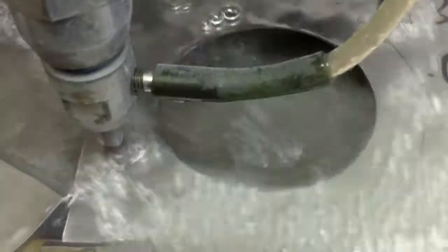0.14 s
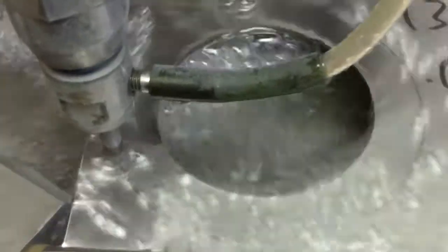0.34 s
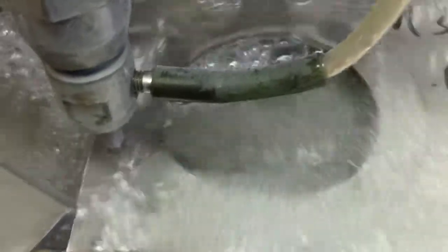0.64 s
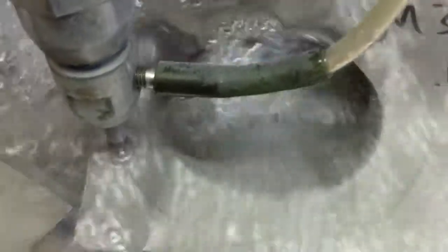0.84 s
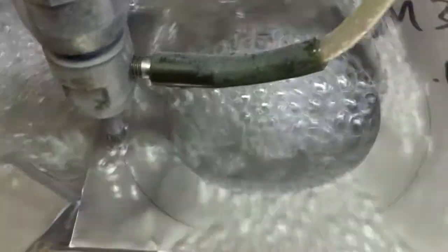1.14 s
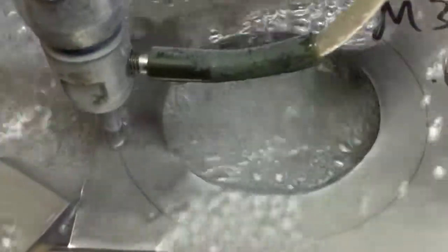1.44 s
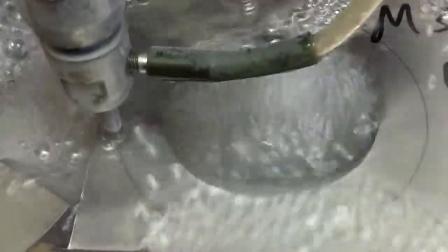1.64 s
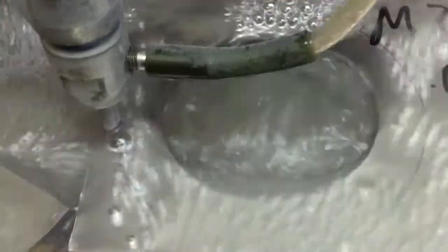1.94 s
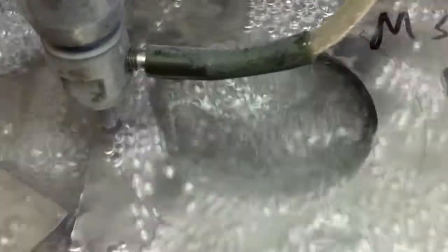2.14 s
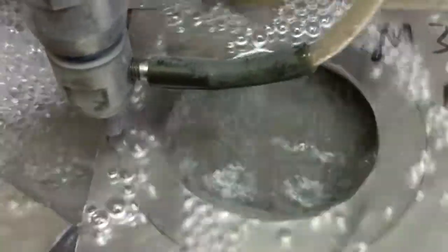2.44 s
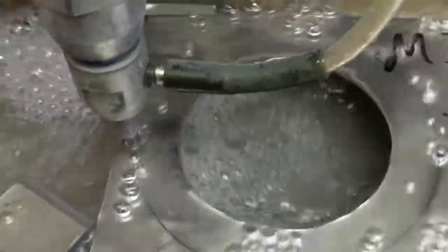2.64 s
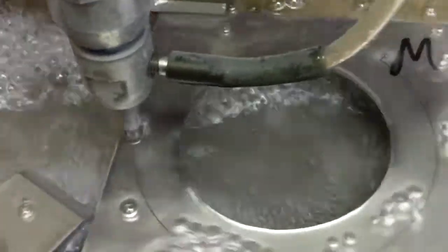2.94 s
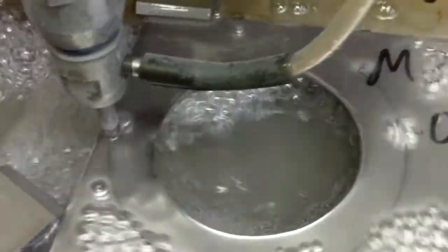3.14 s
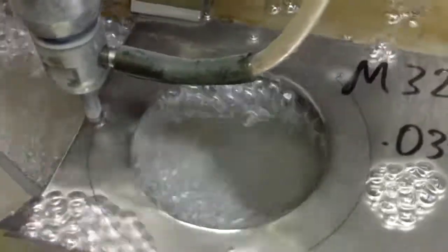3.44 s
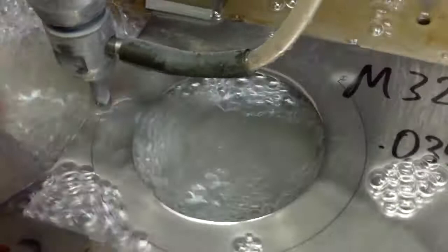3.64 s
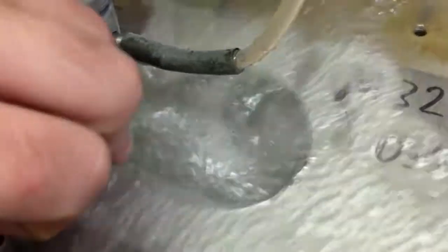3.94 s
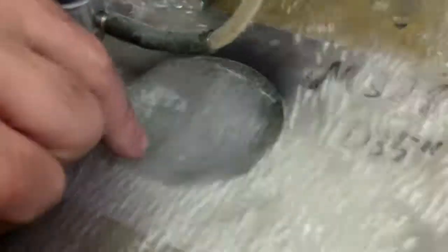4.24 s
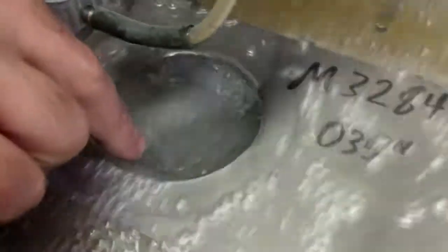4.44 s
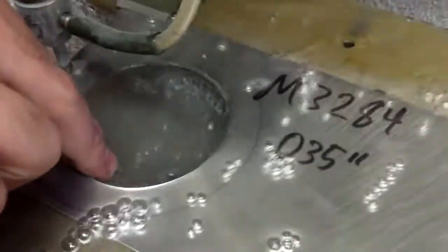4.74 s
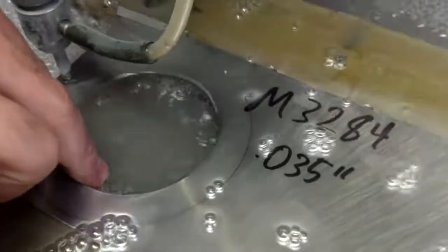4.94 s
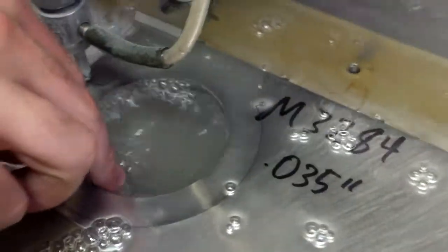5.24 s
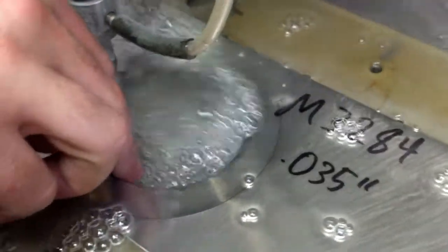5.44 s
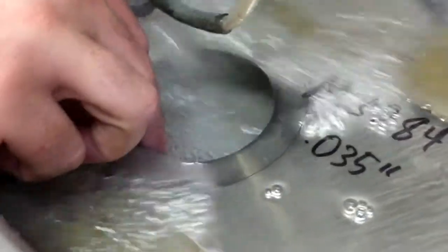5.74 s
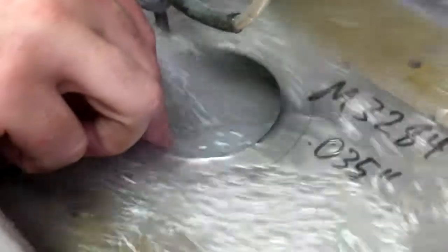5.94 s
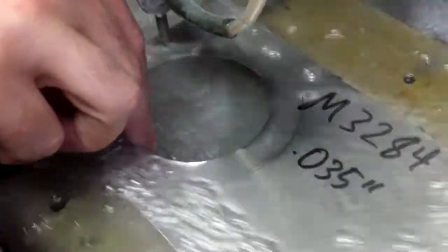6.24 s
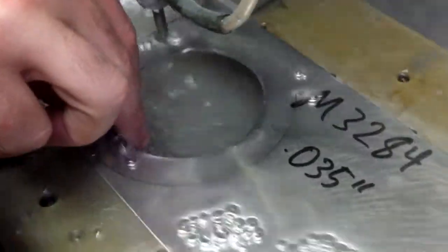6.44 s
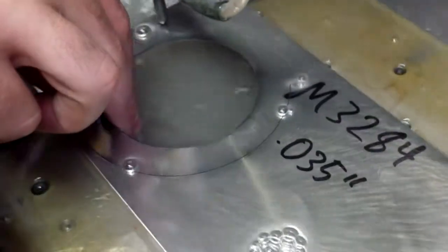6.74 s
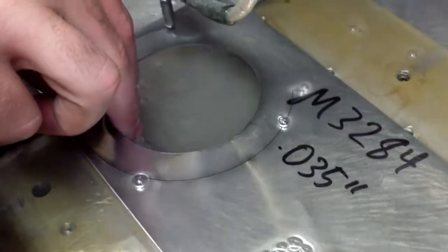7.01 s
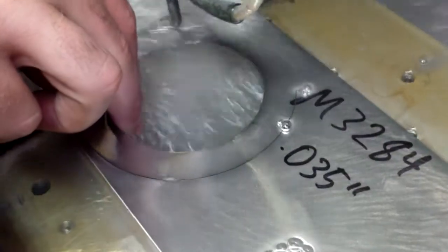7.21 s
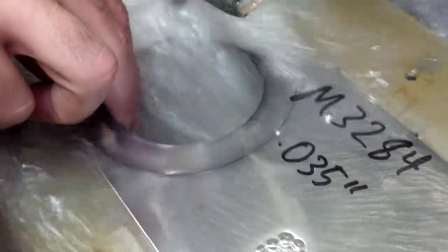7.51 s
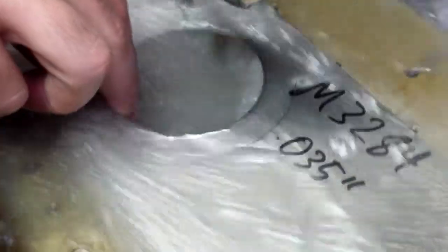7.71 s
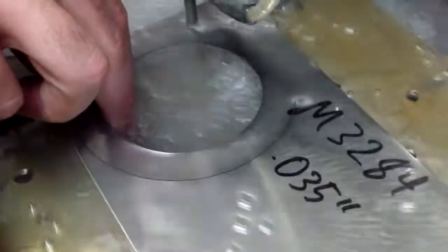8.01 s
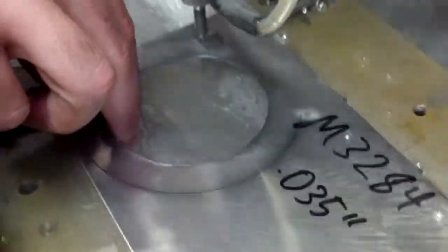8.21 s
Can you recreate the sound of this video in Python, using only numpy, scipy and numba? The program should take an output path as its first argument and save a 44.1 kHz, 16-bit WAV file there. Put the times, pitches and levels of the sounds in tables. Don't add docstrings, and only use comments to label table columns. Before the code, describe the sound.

A fierce treble hiss of pressurised water fills a workshop close-up, clipped and crackling, with spray knocking the microphone into bassy buffets. Small dips flutter through it. Waves smother the nozzle three times, the middle time longest, dropping the sound to muffled fizz, bubbling, metal resonance and humming machinery; each time the jet returns abruptly. The sound is essentially central, with only slight differences between sides.

```python
import sys
import numpy as np
from scipy import signal
from scipy.fft import rfft, irfft
from scipy.io import wavfile
from scipy.ndimage import uniform_filter1d
from numba import njit

SR = 44100
rng = np.random.default_rng(int(sys.argv[2]) if len(sys.argv) > 2 else 0)


def magnitude_from_level(level_db):
    exponent = np.asarray(level_db, float) / 20
    return 10 ** exponent


def unload_audio(sound):
    columns = np.transpose(np.atleast_2d(sound))
    steps = np.round(np.clip(columns, -1, 1) * 32767)
    wavfile.write(sys.argv[1], SR, steps.astype(np.int16))


N = 369116


def unit(x):
    return x / np.sqrt(np.mean(x ** 2))


def curves(table):
    s, *columns = np.transpose(table)
    return [np.interp(np.arange(N) / SR, s, column) for column in columns]


def coloured(points):
    hz, db = np.transpose(points)
    f = np.maximum(np.fft.rfftfreq(N, 1 / SR), 1)
    weight_db = np.interp(np.log(f), np.log(hz), db, left=-60)
    return unit(irfft(rfft(rng.standard_normal(N)) * magnitude_from_level(weight_db), N))


@njit
def svf(x, hz, width):
    y, band, low = np.empty(len(x)), 0., 0.
    for i in range(len(x)):
        g, damping = np.tan(np.pi * hz[i] / SR), width / hz[i]
        v = (band + g * (x[i] - low)) / (1 + g * (g + damping))
        band, low, y[i] = 2 * v - band, low + 2 * g * v, damping * v
    return y


def walk(rate):
    hold = int(SR / rate)
    steps = np.repeat(rng.standard_normal(N // hold + 1), hold)
    return 1.3 * uniform_filter1d(uniform_filter1d(steps, hold), hold)[:N]


def ring(hz, width, drift=0.0081, flicker_db=3.5):
    centre = hz * (1 + drift * walk(9))
    x = svf(svf(rng.standard_normal(N), centre, 1. * width), centre, 1. * width)
    return unit(x) * magnitude_from_level(flicker_db * walk(25))


# time in seconds, hiss level in dB, force as bass rasp in dB,
# spray opening (+ bright), wetness of the kerf (+ wet).
FLOW = [(0, -7.5, -31, 0.65, 1.6), (.3, -5, -34, 0.24, 0.091), (1.15, -5.5, -26.5, 0.01, 0.94),
        (2.0, -7, -29, 0, -0.44), (2.6, -7.5, -28, -0.14, .3), (2.9, -9, -29.5, 0.43, 0.49),
        (3.4, -7.5, -23.5, -0.27, 0.32), (3.65, -13.5, -29.5, -0.32, -0.71),
        (4.2, -9.5, -33.5, -0.38, 0.35), (4.65, -9, -32, 0.19, -0.0071), (4.85, -9, -21, 0.94, -1),
        (5.2, -7, -28.5, -.2, 1.6), (5.52, -13.5, -39.5, -0.9, 0.17), (6.3, -8.5, -31.5, 0.059, 0.29),
        (6.75, -8, -24.5, 0.64, 0.2), (7.1, -6.5, -28.5, -0.087, 1.43), (7.7, -7.5, -35.5, -0.083, 0.74),
        (8.37, -6, -22, 0.73, -.8)]
# start in seconds, end in seconds, drowned hiss in dB,
# depth from 0 to 1, churn in dB.
WAVES = [
    (3.651, 3.806, -30.5, 0.05, -32),
    (3.808, 4.113, -33.5, 0.1, -41.5),
    (5.606, 6.271, -29.5, 0.95, -41),
    (7.254, 7.536, -28.5, 0.2, -40.5),
    (7.536, 7.698, -30, 0.2, -31),
]
# start in seconds, length in seconds, level in dB.
SPITS = [(3.69, .006, -8.5), (3.694, .016, -19), (3.743, 0.006, -16), (3.787, .011, -25),
         (3.797, .008, -11.5), (3.87, .005, -25), (3.922, 0.0044, -16), (3.941, .005, -20),
         (3.977, .01, -23.5), (4.009, .006, -23), (4.048, 0.033, -15.5), (4.077, .041, -27.5),
         (5.624, .004, -18.5), (7.26, .012, -17), (7.272, .02, -22), (7.314, .005, -18),
         (7.371, 0.053, -11), (7.418, .026, -16), (7.446, .007, -6), (7.453, .012, -23), (7.465, .044, -8),
         (7.507, 0.025, -14.5), (7.558, .014, -11), (7.57, .008, -18), (7.628, .009, -11),
         (7.636, .013, -13.5), (7.649, .008, -24)]
# start in seconds, length in seconds, level in dB.
LULLS = [(0.104, .018, -13), (0.685, 0.016, -28), (0.701, .011, -16), (0.769, 0.01, -21),
         (.996, 0.013, -25), (2.342, .008, -32), (2.371, 0.018, -15.5), (3.596, 0.01, -25),
         (4.118, .078, -12.5), (4.239, .012, -16), (4.252, 0.013, -25), (4.302, 0.01, -24),
         (5.428, .095, -11.5), (5.432, .005, -17), (5.457, 0.006, -22), (5.482, 0.0032, -10),
         (5.498, 0.0087, -25), (5.524, .093, -24), (4.15, .005, -17), (4.178, .007, -17),
         (7.224, 0.038, -13.5), (7.23, 0.0034, -26), (7.481, .005, -20), (7.499, 0.0044, -24),
         (7.74, 0.0045, -22), (7.84, 0.0068, -3), (7.85, .009, -22)]
RECOVER_DB, RECOVER_S = 8, 0.14


def cover():
    i = np.arange(N)
    held, depth, drowned = curves(FLOW)[0], np.zeros(N), np.zeros(N, bool)
    span = lambda s, end: slice(int(s * SR), int(end * SR))
    for s, end, db, deep, _ in WAVES:
        held[span(s, end)], depth[span(s, end)], drowned[span(s, end)] = db, deep, True
    dry = ~drowned
    for s, length, db in SPITS + LULLS:
        held[span(s, s + length)], drowned[span(s, s + length)] = db, False
    last_loud = np.maximum.accumulate(i * (dry | (held > -16)))
    hush_s = (i - last_loud) / SR
    regained_db = RECOVER_DB * (1 - np.exp(-hush_s / RECOVER_S))
    return held + drowned * regained_db, uniform_filter1d(depth * (held < -16), size=400), regained_db


# time in seconds, drop of the bias in dB.
BLASTS = [(.133, -10.5), (.201, -6.5), (.374, -9.5), (.738, -17), (1.268, -13), (1.581, -13), (1.677, -16),
          (1.809, -15), (1.849, -21), (2.176, -16), (2.35, -25), (2.398, -28), (2.489, -13), (2.551, -14),
          (3.02, -19), (3.155, -18), (3.381, -17), (3.691, -10.5), (4.199, -9), (4.43, -15), (4.889, -15),
          (5.122, -11.5), (6.422, -9.5), (6.646, -11), (6.743, -10.5), (7.126, -10), (7.176, -24),
          (7.472, -5), (7.985, -23), (8.118, -40)]
SURGE_DB, SURGE_S, DROWNED_RASP_DB = 20.5, 0.027, -38


def rasp():
    t = np.arange(N) / SR
    swell = 0
    for s, db in BLASTS:
        spread_s = SURGE_S * np.where(t < s, .5, 1.2)
        swell = swell + magnitude_from_level(db) * np.exp(-((t - s) / spread_s) ** 2)
    under = uniform_filter1d(1. * (cover()[1] > .05), size=800)
    return (1 - under) * curves(FLOW)[1] + under * DROWNED_RASP_DB + SURGE_DB * swell


# frequency in Hz, level in dB, share of the load shift in dB per dB.
PUMP = [
    (81.8, 1, 0.63),
    (110.7, 0, -1.3),
    (168, -13, -0.077),
]
# time in seconds, shift between the lines in dB, drone level in dB.
LOAD = [
    (0, 4, -44),
    (3.5, 1, -40),
    (3.8, 0, -42.5),
    (5.3, 5, -42),
    (5.63, 4, -51),
    (5.69, 5, -32),
    (5.84, 3.5, -29.5),
    (5.92, -4.5, -35),
    (6.4, -4, -42),
    (8.37, 6, -55.5),
]


def pump():
    load_db = curves(LOAD)[0]
    tone = lambda hz: np.sin(np.cumsum(2 * np.pi * hz * (1 + 0.0115 * walk(12)) / SR))
    return sum(magnitude_from_level(db + share * load_db + 2.1 * walk(10)) * tone(hz) for hz, db, share in PUMP)


# frequency in Hz, density in dB per Hz.
SHOP_COLOUR = [(88, -34), (150, -4), (270, -12), (315, -6.5), (415, -8.5), (758, -6.5), (1020, -4.5),
               (1690, -4), (3390, -10.5), (4210, -17), (6000, -9.5), (7800, -10), (13200, -120)]
# frequency in Hz, width in Hz, level in dB.
SHEET = [(1024, 103, -11.5), (1300, 220, -10.5), (1714, 230, -12.5), (2400, 390, -11.5), (8660, 170, -8),
         (5940, 160, -13)]
CHURN_DB, CHURN_PER_RASP, CHURN_RISE = -25.5, 0.63, 2.01


def shop():
    held, depth, regained_db = cover()
    free_db, force_db = curves(FLOW)[:2]
    start, *_, level_db = np.transpose(WAVES)
    latest = np.maximum(np.searchsorted(start, np.arange(N) / SR) - 1, 0)
    wave_db = level_db[latest] + CHURN_RISE * regained_db
    spray_db = CHURN_DB + CHURN_PER_RASP * (force_db + 27) + 0.3 * np.minimum(held - free_db, 0)
    churn_db = uniform_filter1d(np.where(depth > .05, wave_db, spray_db), size=500)
    x = coloured(SHOP_COLOUR) * magnitude_from_level(1.7 * walk(20))
    for hz, width, db in SHEET:
        level = magnitude_from_level(db - 12 * (hz > 4000) * (1 - depth))
        x = x + level * ring(hz, width, drift=0.0034, flicker_db=2.5)
    return x * magnitude_from_level(churn_db + 2.0) + pump() * magnitude_from_level(curves(LOAD)[1])


def water_gate():
    held = cover()[0]
    fall = np.exp(-1 / (.0045 * SR))
    held = np.maximum(held, signal.lfilter([1 - fall], [1, -fall], held))
    sputter = -np.clip(walk(130) - .6, 0, .9) * 4
    sputter = sputter + 1.62 * walk(300)
    return uniform_filter1d(held, size=24) + sputter


def patchy(points, patchy_db=2.5, calm=1):
    x, out = coloured(points), 0
    for hz in np.arange(1500., 16000., 550.):
        centre = np.full(N, hz)
        band = svf(svf(x, centre, 800.), centre, 800.)
        out = out + band * magnitude_from_level(calm * (patchy_db * walk(16) + 0.67 * walk(3.035)))
    return unit(out)


# frequency in Hz, density in dB per Hz.
HISS = [(1500, -34), (3500, -19.5), (5500, -12), (7000, -7.5), (8500, -10.5), (9250, -7.5), (10000, -4.5),
        (12000, -6), (14000, -15), (17000, -10)]
# free level in dB, dB per opening, dB per wetness,
# dB at full depth, dB per dB of force.
RINGS = [
    (-16, 4.5, 9, 3, 0.2),
    (-21, -6, 7, 1.5, 0.13),
    (-15, -6.5, -0.5, -0.5, -0.04),
    (-10.5, -2.5, -0.5, -8.5, -0.18),
    (-14, 7.5, -2, -5, 0.2),
]
MAIN_HZ, MAIN_SAG_HZ, MAIN_HZ_PER_OPENING = 10942, 300, 502
OVERLOAD, QUIET_BASS_DB = 0.59, -38


def jet():
    force_db, opening, wet = curves(FLOW)[1:]
    depth = cover()[1]
    ring_db = []
    for db, per_opening, per_wet, per_depth, per_force in RINGS:
        flow_db = db + per_opening * opening + per_wet * wet + per_depth * depth
        ring_db.append(flow_db + per_force * (force_db + 29.5) * (1 - depth))
    low_db, kerf_db, nozzle_db, main_db, top_db = ring_db
    total = np.sqrt(sum(magnitude_from_level(2 * db) for db in ring_db))
    main_hz = MAIN_HZ - MAIN_SAG_HZ * depth + MAIN_HZ_PER_OPENING * np.minimum(opening, .4)

    howl = 0.64 * ring(main_hz * .96, 890, flicker_db=4.0)
    howl = howl + 0.67 * ring(main_hz * 1.04, 995, flicker_db=3.5)
    x = magnitude_from_level(-3.5 + 2.6 * depth) * patchy(HISS, calm=1 - .6 * depth)
    x = x + magnitude_from_level(main_db) / total * howl
    x = x + magnitude_from_level(low_db - 13.5) / total * ring(5690 - 1100 * opening, 3800, drift=0.041)
    x = x + magnitude_from_level(kerf_db - 2.5) / total * ring(7227, 1040, drift=0.035)
    x = x + magnitude_from_level(nozzle_db - 1.5) / total * ring(8538, 770)
    x = x + magnitude_from_level(top_db - 4.5) / total * (0.84 * ring(12700, 1090) + ring(14110, 3430))

    gate_db = water_gate()
    free = np.clip((gate_db + 16.5) / 6, 0, 1)
    drive_db = OVERLOAD * np.maximum(rasp() - QUIET_BASS_DB, 0) + 1.63 * walk(30) + 4.5
    return unit(x) * magnitude_from_level(gate_db + free * drive_db)


def scene():
    return np.tile(jet() + shop(), (2, 1))


BIAS_S, KNOCK_RISE_S = .016, .004
SMALL_RATE, SMALL_DB = 57, 4


def knocks():
    blasts, rise = np.zeros(N), int(KNOCK_RISE_S * SR)
    s, db = np.transpose(BLASTS)
    blasts[(s * SR).astype(int)] = magnitude_from_level(db + 0.5)
    when, size = rng.random(N), rng.exponential(size=N)
    small = (when < SMALL_RATE / SR) * magnitude_from_level(rasp() + SMALL_DB + 3.2 * np.minimum(size, 1.8))
    kick = uniform_filter1d(blasts, size=rise * 2 // 3) + uniform_filter1d(small, size=rise // 3)
    return signal.lfilter([1], [1, -np.exp(-1 / (BIAS_S * SR))], kick)


# frequency in Hz, density in dB per Hz.
WOBBLE = [(30, 5), (100, 1), (300, -6), (800, -10.5), (1700, -20.5)]
# time in seconds, peak in dB.
JOLTS = [(.191, -6), (.64, -15), (1.016, -19), (1.118, -2), (1.678, -11), (1.911, -10), (2.055, -22),
         (2.223, -9.5), (2.305, -18), (2.349, -22), (2.467, -11), (2.533, -14), (2.611, -6), (2.829, -8),
         (3.226, -12.5), (3.688, -23), (4.197, -7), (4.212, -19), (4.43, -22), (4.791, -8), (5.067, -11),
         (5.264, -10), (6.305, -12), (6.384, -2.5), (6.619, -11), (7.038, -7.5), (7.121, -8),
         (7.474, -10.5), (7.809, -9), (8.269, -4)]


def wobble():
    t, noise = np.arange(N) / SR, coloured(WOBBLE)
    patter = unit(noise * magnitude_from_level(5.35 * walk(120) + 3.3 * walk(22))) * magnitude_from_level(rasp() + 16)
    clusters = sum(magnitude_from_level(db + 8.5) * np.exp(-((t - s - .006) / 0.0034) ** 2) for s, db in JOLTS)
    return patter + noise * clusters


FILL_RATE, FILL_DB = 5., -17


def noise_fill():
    out, frame = np.zeros(N), 2048
    f = np.fft.rfftfreq(frame, 1 / SR)
    draws = rng.random((N // 1024, 2))
    for start, (when, pick) in zip(range(914, N - frame, frame // 2), draws):
        hz = 5000 + 10000 * pick
        burst = irfft(rfft(rng.standard_normal(frame)) * (np.abs(f - hz) < .1 * hz))
        chosen = when < FILL_RATE * frame / 2 / SR
        out[start:start + frame] += unit(burst) * np.hanning(frame) ** 2 * chosen
    return out * magnitude_from_level(FILL_DB)


def band_limit(x):
    return signal.sosfilt(signal.butter(12, 15740, fs=SR, output="sos"), x)


BIAS_TOP, OFF_CENTRE = 0.36, 0.072
CLIP, KNEE = 0.53, 9.
COUPLING_HZ, TOP_HZ = 5.5, 15780


def record(dry):
    couple = signal.butter(2, COUPLING_HZ, "high", fs=SR, output="sos")
    swing = uniform_filter1d(np.abs(dry), size=300)
    x = dry + (OFF_CENTRE + wobble()) * np.maximum(swing - BIAS_TOP, 0)
    x = x / (1 + np.abs(x / CLIP) ** KNEE) ** (1 / KNEE)
    x = signal.sosfilt(couple, x - knocks()) + .012
    loud = uniform_filter1d(np.abs(x[0]), size=3000) > .3
    x = x + noise_fill() * loud * np.array([[1], [-1]])
    x = signal.sosfilt(signal.ellip(12, .2, 80, TOP_HZ, fs=SR, output="sos"), x)
    return band_limit(np.clip(x, -1, 1))


dry = scene()
out = record(dry)
unload_audio(out)
```